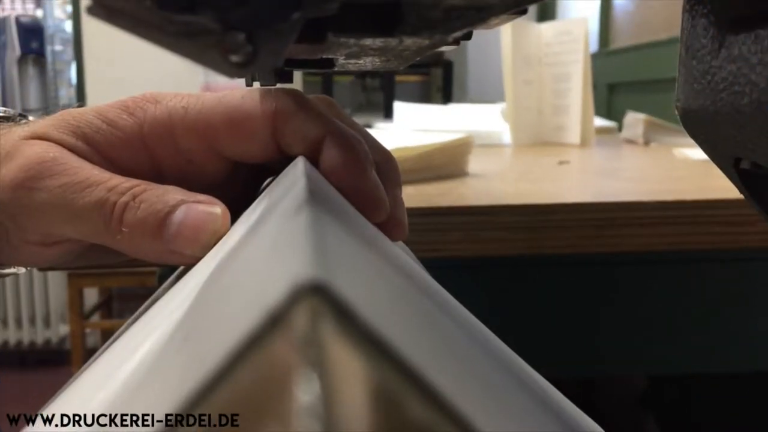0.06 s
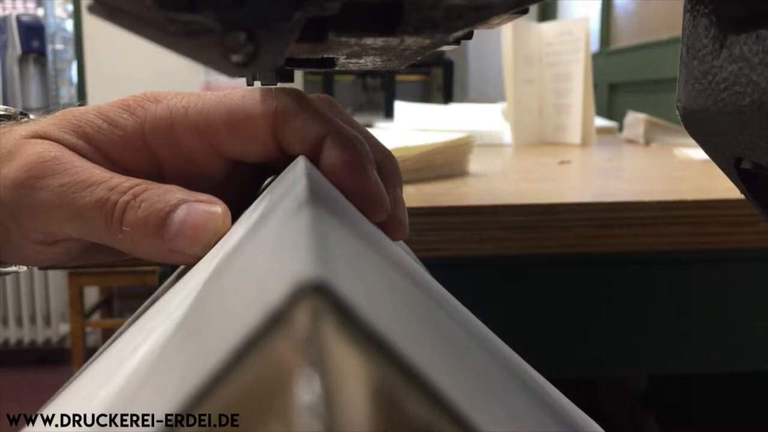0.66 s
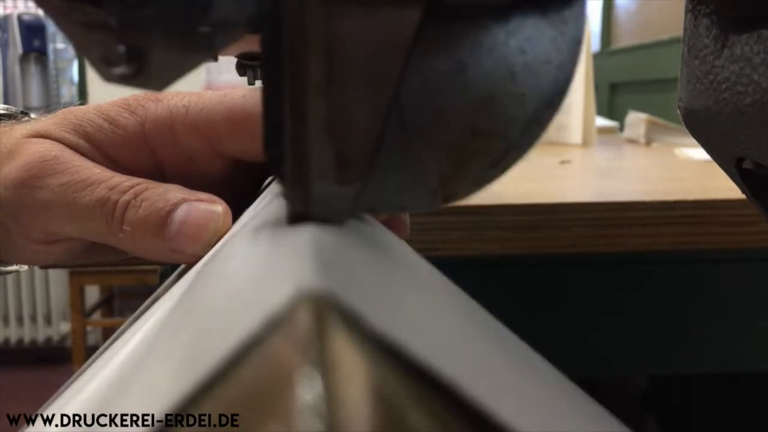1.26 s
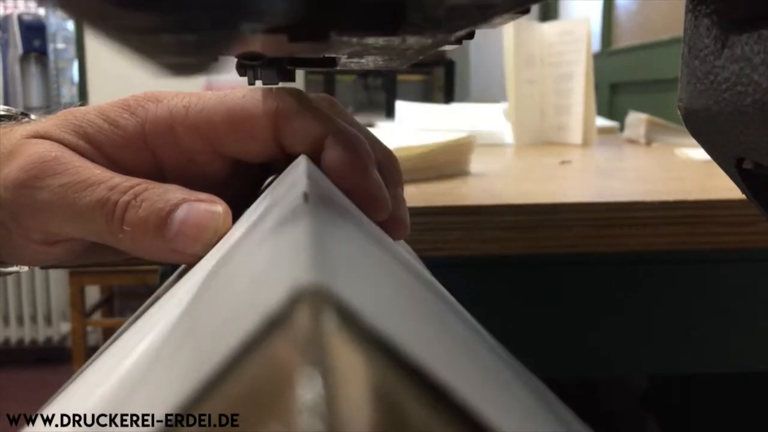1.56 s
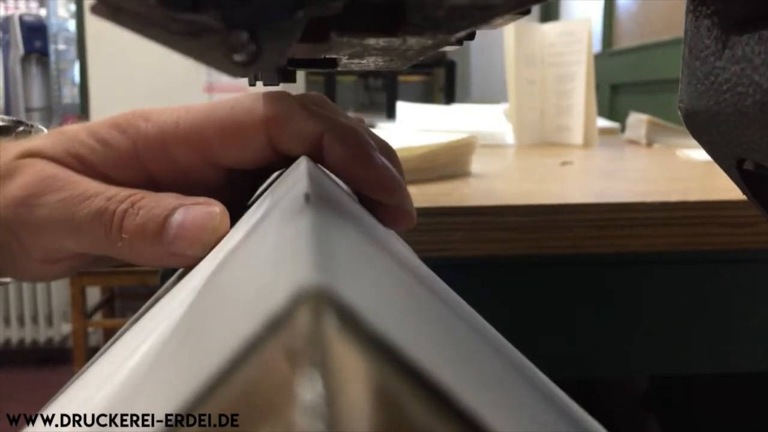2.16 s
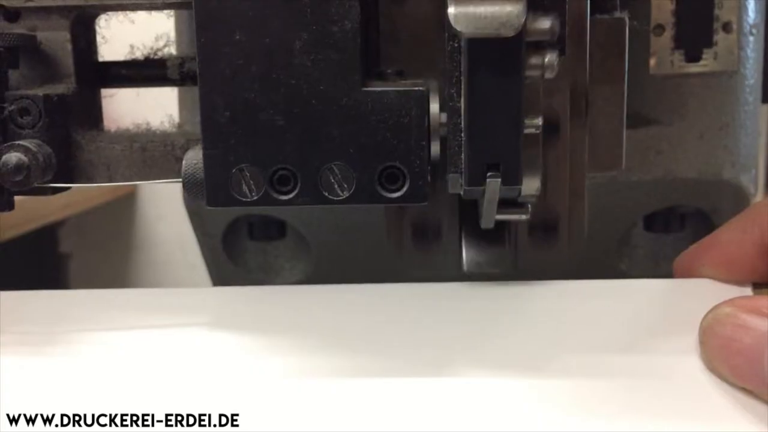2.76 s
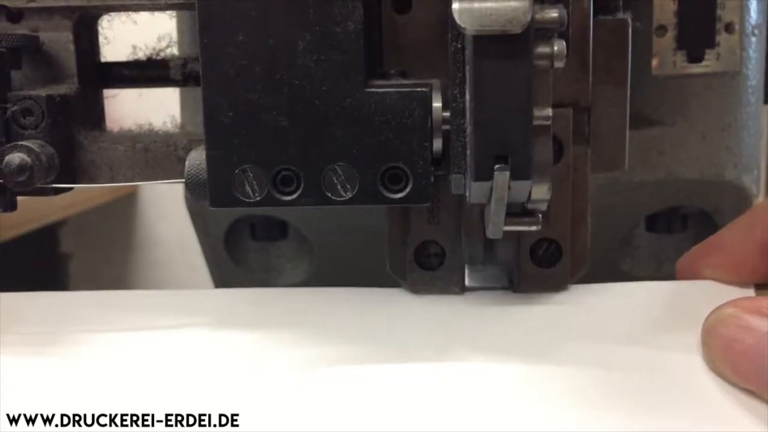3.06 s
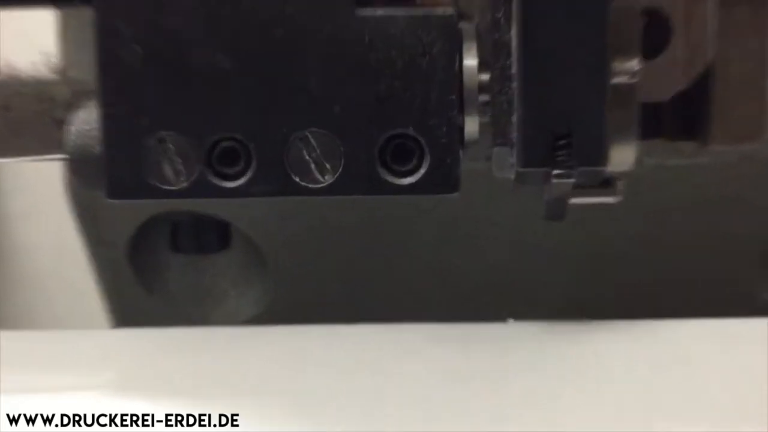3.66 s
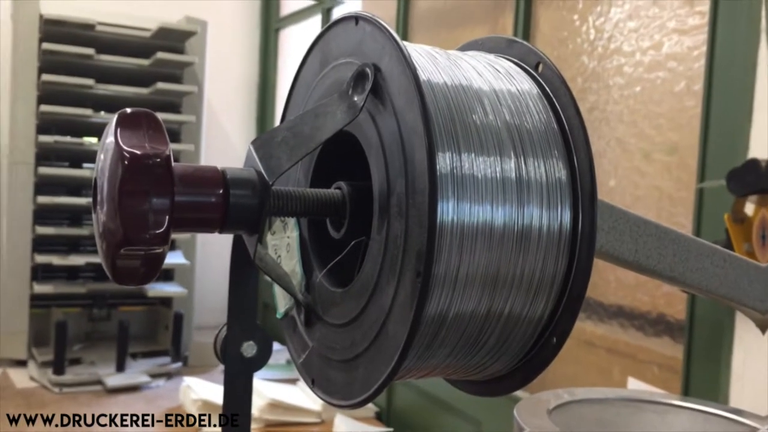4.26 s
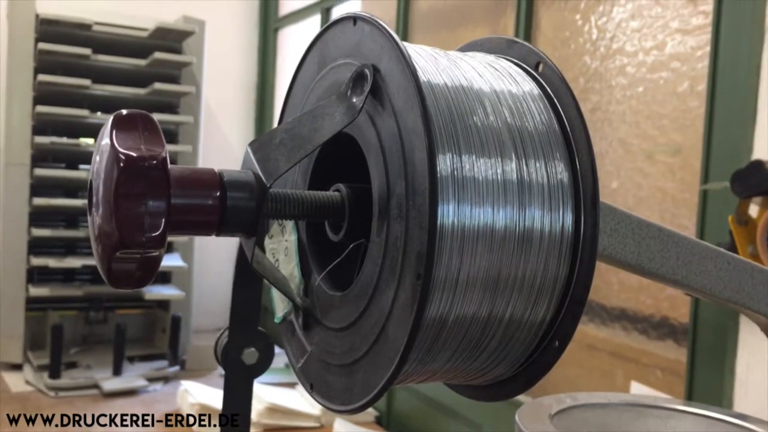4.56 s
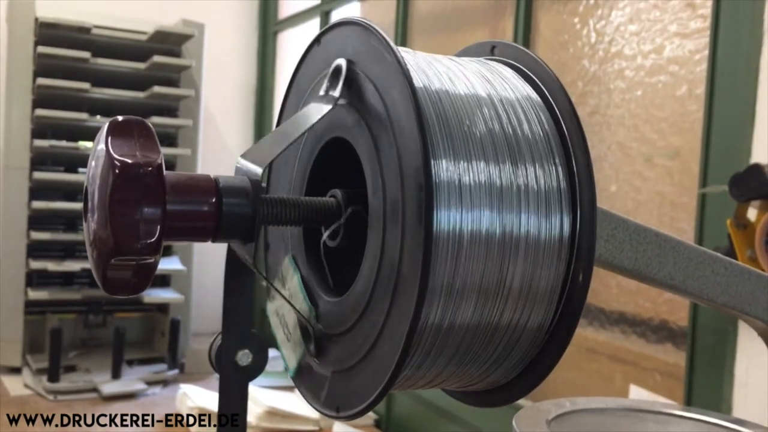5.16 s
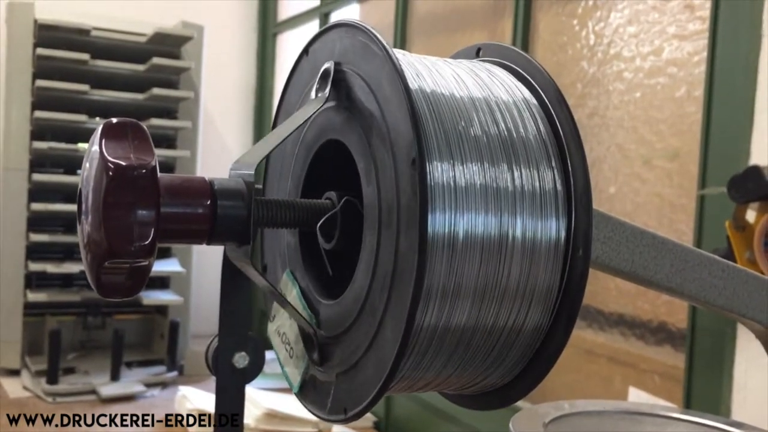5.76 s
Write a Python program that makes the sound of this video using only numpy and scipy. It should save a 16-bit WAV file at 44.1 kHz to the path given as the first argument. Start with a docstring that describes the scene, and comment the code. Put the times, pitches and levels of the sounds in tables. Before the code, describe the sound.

A wire stitching machine drives three staples, each a burst of about a second of rattling cams, rasping wire and clanking steel, with a slam and a run of ticks near the end. The microphone jumps from the saddle to the head, where the wire rasps more, then to the spool, where it sounds softer and roomier. Padded table knocks precede the first and third cycles, and faint shop air lies underneath.

```python
"""A wire stitcher drives three staples, heard from the saddle, the stitching head, then the wire spool.
Each time the clutch bites, cams chatter, wire rasps through its guides and steel parts clank, up to
the slam of the head and the ticking of the feed pawl. Sliding parts squeak; the cast frame rumbles,
hums and rings. The first two cycles cut off as the listening place changes. Soft table knocks lead
into the first and third, and a booklet slides away after the first, all over quiet shop air."""
import sys
import numpy as np
from scipy import signal
from scipy.io import wavfile
from scipy.ndimage import uniform_filter1d, minimum_filter1d

SR = 44100
rng = np.random.default_rng(int(sys.argv[2]) if len(sys.argv) > 2 else 0)


def to_wav(sig):
    """Store sig (one row per channel, or 1-D mono) as 16-bit WAV at the path in sys.argv[1].

    Samples outside -1..1 are clipped; the rate is SR.
    """
    pcm = np.clip(np.atleast_2d(sig), -1, 1) * 32767
    pcm = np.round(pcm).astype(np.int16)
    wavfile.write(sys.argv[1], SR, pcm.T)  # frames by channels


N = 264908
T = np.arange(N) / SR

# Listening places: saddle, head, spool. Each row: start and end in seconds.
PLACES = [(0, 2.324), (2.324, 3.823), (3.823, 6.1)]
# One turn of the cam shaft per place. Each row: clutch and slam times in seconds, then trims in dB
# for rattle, rasp and pawl, rumble, thuds, coasting gear and reverb.
CYCLES = [(0.804, 1.580, 0, -2, -1.5, 0.5, -1.5, -16), (2.732, 3.511, 0, 3.5, -2, -0.5, -1.5, -17.5),
          (4.100, 4.898, -5.5, -2, -6, -15, 5.5, -9)]

# Tone curves of the noise layers. Each row: frequency in Hz, relative level in dB.
SHOP_TONE = [(12, -51), (20, -4), (33, -13.5), (143, -19.5), (229, -26.5), (302, -30), (421, -17),
             (1680, -33.5), (3090, -37), (3550, -42), (4820, -38.5), (5850, -40), (15000, -64.5)]
RATTLE_TONE = [(100, -24.5), (220, -7), (330, 1), (500, 2.5), (750, 2.5), (1000, -2.5), (1500, -5.5),
               (2300, -14.5), (3200, -24.5), (6000, -43.5)]
RASP_TONE = [(1200, -1.5), (2500, 2), (3080, 7.5), (3450, -2.5), (3950, 1.5), (5200, -5.5), (5800, -7.5),
             (7000, -13), (11000, -18), (13000, -18.5), (15000, -21)]
RUMBLE_TONE = [(12, -11.5), (28, -4), (45, -0.5), (75, 7), (100, 1), (170, -1), (240, -0.5), (400, -11.5),
               (1000, -79)]
CLANK_TONE = [(60, -22), (200, -16), (450, 3), (750, 0.5), (1300, 0.5), (2000, -3), (3000, -11.5),
              (4500, -22), (7000, -51.5), (15000, -57.5)]
TICK_TONE = [(500, -26.5), (2000, -5.5), (4300, 6.5), (5600, 2), (7000, -5), (11000, -7), (15000, -14.5)]

# Soft knocks on the table. Each row: start in seconds, level in dB.
KNOCKS = [(0.0, -50.5), (0.035, -49.5), (0.068, -51.5), (0.12, -56), (0.503, -27.5), (0.514, -44.5),
          (0.561, -54), (0.617, -37), (0.668, -56), (0.735, -45), (3.870, -30), (3.915, -31), (3.98, -39),
          (4.03, -40.5)]
# The table's ring. Each row: pitch in Hz, level in dB, t60 (time to die by 60 dB) in seconds.
TABLE_MODES = [(342, -8, 0.069), (497.7, -12, 0.23), (547, -3, 0.033), (825, -30.5, 0.48),
               (1110, -29.5, 0.35), (1780, -26.5, 0.15), (1992, -32, .3), (2492, -38.5, .12)]
# The room's tail. Each row: frequency in Hz, t60 in seconds.
ROOM_DECAY = [(100, 0.44), (500, 0.94), (1500, 1), (4000, 0.61), (12000, 0.9)]

# The gear running light: relative levels of rattle, rasp and rumble in dB.
IDLE_DB = (-28.5, -54.5, -29.5)
# As the gear coasts, those three step to a new level, then die away.
COAST_STEP_DB, COAST_DB_PER_S = (-3.5, -2, 0.5), (29, 9, 28)
# Stretches of work that load the gear. Each holds: start from the slam, length and release t60
# in seconds, then relative levels of rattle, rasp and rumble in dB.
RUN_UP = (-0.775, .2, .15, -23, -57, -26.5)
FORMING = (-0.605, .15, .16, -18, -35, -26.5)
DRIVING = (-0.32, .025, .2, -21.5, -38, -31)
CLINCHING = (-0.195, .065, .36, -13, -23.5, -24.5)
FEEDING = (0.045, .135, .25, -17, -21, -29)

# The cast frame's ring. Each row: pitch in Hz, t60 in seconds, level in dB at saddle, head and spool.
FRAME_MODES = [(81.5, 0.3, -21.5, -26.5, -25), (118.7, 0.26, -21, -26, -21.5),
               (168.5, 0.23, -22.5, -17.5, -19), (224.4, 0.25, -20.5, -19.5, -18),
               (318, 0.12, -15.5, -27, -21.5), (468.4, 0.35, -19, -23.5, -19.5),
               (615.3, 0.25, -31.5, -28, -16.5), (696, 0.49, -30, -22, -20.5), (945, 0.2, -22, -21, -24.5),
               (1383, 0.3, -23.5, -21, -18.5), (1810, 0.17, -41.5, -27, -33.5),
               (1940, 0.26, -27.5, -34.5, -25.5), (3930, 0.079, -34, -28, -40)]
# Steel blows of every turn. Each row: start from the slam, contact time and clank t60 in seconds,
# note in Hz, note and clink trims in dB, level in dB at the three places, tick trim in dB at the three.
BLOWS = [(-0.795, .003, .07, 645, 2, -25, -60, -60, -22, -30, -30, -30),
         (-0.738, .002, .065, 830, -6, -26, 0.5, 1, -23, -40, -29, -14),
         (-0.699, .0012, .055, 1100, -8, -13, -1, -0.5, -13, -5.5, -6, -8),
         (-0.638, .001, .07, 2207, -10, -9, 1.5, -4, -9, -13, -10, -13),
         (-0.628, .001, .04, 900, -4, -13, -6, -10, -14, -10, -4, -18),
         (-0.606, .003, .07, 570, -4, -16, -5, -3, -2.5, -24, -33, -16),
         (-0.523, .0008, .06, 1280, -6, -13, 7, 1.5, -8.5, -20, -21, -30),
         (-0.495, .001, .062, 1410, -3, -11, 1.5, 3.5, -11, -13, -17, -15),
         (-0.465, .002, .065, 866, -8, -14, -4, -4, -18, -18, -17, -19),
         (-0.367, .001, .032, 730, 2, -6, -16, -23, -30, -28, -9, -20),
         (-0.339, .0005, .09, 616, -3, -19, 8.5, 6, -7, -18, -15, -22),
         (-0.216, .0007, .09, 2244, -6, -5, 2.5, -1, -11, -10, -14, -24),
         (-0.193, .005, .09, 670, -3, -16, -1, 6, -8, -23, -12, -15),
         (-0.141, .0012, .05, 1447, -1, -17, -6, -2.5, -16, -2, -6, -4),
         (-0.109, .0015, .045, 1483, -7, -18, -6, -9, -16, -12, -6, -6),
         (-0.069, .001, .03, 620, 1, -16, -28, -26, -30, 5, 2, 0),
         (-0.014, .001, .03, 610, -7, -16, -12, -30, -30, -11, -18, -18),
         (0.000, .0006, .072, 900, -7, -13, 17, 17, 0.5, -18, -17, -15),
         (0.015, .005, .065, 700, -1, -24, 4.5, -2, -2, -23, -25, -22),
         (0.048, .004, .068, 747, 0, -10, -8, -1, -11, -24, -14, -21),
         (0.138, .005, .09, 830, -4, -9, 0.5, -0.5, -13, -28, -10, -16),
         (0.176, .004, .075, 790, 3, -20, -7.5, -4.5, -7.5, -23, -19, -21),
         (0.219, .001, .046, 958, 0, -23, -7, -5, -14, -34, -34, -30),
         (0.257, .0015, .055, 850, -4, -21, 0, -6, -20, -20, -14, -27)]
# Small steel parts in the head. Each row: pitch in Hz, t60 in seconds, relative level in dB.
STEEL_MODES = [(1866, .07, 3.5), (2020, .04, -5.5), (2420, 0.047, 8), (2742, 0.085, -8), (3040, 0.035, 3.5),
               (3212, 0.015, -9), (3530, 0.017, -7.5), (3920, .06, -2), (4620, 0.043, -12.5),
               (5130, 0.048, -5.5), (5600, 0.046, -17)]
# Brief tones: squeaks and groans of sliding parts, low hums of the frame, and one faint ting with a
# table knock. Each row: start and length in seconds, pitch in Hz, level in dB, rise as a share of pitch.
BRIEF_TONES = [(0.798, 0.05, 329, -29.5, 0), (1.289, 0.063, 2240, -34, 0.065), (1.42, .1, 1550, -31, 0.012),
               (3.33, 0.14, 165.5, -28, 0.0076), (3.52, 0.1, 161.7, -28, 0.017),
               (3.905, 0.028, 1980, -57, 0.043), (4.079, 0.215, 318, -32.5, 0.2),
               (4.198, 0.069, 339.7, -27, 0.015), (4.285, .075, 589, -25, 0.016),
               (4.95, 0.17, 3137, -40, 0)]
# Low shoves of the head on the saddle. Each row: start from the slam in seconds, relative level in dB,
# pitch in Hz, t60 in seconds.
THUDS = [(-0.765, -20, 120, .15), (-0.628, -11.5, 76, .15), (-0.463, -8, 61, .14), (-0.334, -17, 40, .2),
         (-0.04, -17.5, 32, .29), (0.0, -11.5, 74, .12), (0.02, -20, 118, .15)]
# Microphone colour, with hollows in the treble. Each row: frequency in Hz, gain in dB.
MIC_TONE = [(20, 4), (2300, 0.5), (2620, -1.5), (2900, 0.5), (6000, -2), (6400, -8), (7350, -5.5),
            (7650, -20), (8400, -18.5), (8700, -7.5), (9600, -10), (10100, -2.5), (12800, -1), (15000, -6),
            (16000, -21)]


def amp(db):
    """Decibels as a gain."""
    return 10 ** (np.asarray(db) / 20)


def unit(x):
    """The signal at an RMS of one."""
    return x / np.sqrt(np.mean(x ** 2) + 1e-20)


def curve_at(points, hz):
    """A curve's value along a log frequency axis."""
    f, value = np.transpose(points)
    return np.interp(np.log(hz + 1), np.log(f), value)


def add(mix, start, sound):
    """Lay a sound into the mix at a time in seconds."""
    part = mix[max(round(start * SR), 0):][:len(sound)]
    part += sound[:len(part)]


def fade(t, t60):
    """A decay that loses 60 dB every t60 seconds."""
    return np.exp(-np.log(1000) * t / np.maximum(t60, 1e-3))


def colour(x, tone, size=4096):
    """A minimum-phase EQ that follows a tone curve."""
    log_gain = np.log(amp(curve_at(tone, abs(np.fft.fftfreq(size, 1 / SR)))))
    taps = np.fft.ifft(np.exp(np.conj(signal.hilbert(log_gain)))).real
    return signal.oaconvolve(x, taps)[:len(x)]


def noise(tone, length=N):
    """Steady noise shaped to a tone curve."""
    return unit(colour(rng.standard_normal(length), tone))


def shop_air(level_db=-68):
    """The quiet shop: a faint, dark bed of noise."""
    return amp(level_db) * noise(SHOP_TONE)


def table_knocks(scuff_db=-7, scuff_t60=.17, rise_s=0.0014):
    """Light, padded knocks ring the table, each with a short scuff."""
    out, t = np.zeros(N), T[:SR // 2]
    ring = sum(amp(db) * np.sin(2 * np.pi * hz * t) * fade(t, t60) for hz, db, t60 in TABLE_MODES)
    scuff_tone = [(80, -18.5), (330, -1), (550, 14), (1000, -12.5), (2500, -24), (9000, -50)]
    for start, db in KNOCKS:
        scuff = amp(scuff_db) * noise(scuff_tone, len(t)) * fade(t, scuff_t60)
        add(out, start, amp(db) * (1 - np.exp(-t / rise_s)) * (ring + scuff))
    return out


def room(x, wet_db, onset_s=0.004):
    """The room adds a diffuse tail that hangs longest in the mids."""
    hz, t, bands = signal.stft(rng.standard_normal(SR), SR, nperseg=256)
    envelope = fade(t, curve_at(ROOM_DECAY, hz)[:, None]) * (1 - np.exp(-t / onset_s))
    tail = signal.istft(bands * envelope, SR, nperseg=256)[1]
    return x + amp(wet_db) * signal.oaconvolve(x, tail / np.linalg.norm(tail))[:N]


def gear_effort(clutch, slam, coast_db, slip_db=-12, slip_s=.05, engage_s=.025, load_s=.012,
                run_on_s=.26, brake_s=.05):
    """Rattle, rasp and rumble envelopes: the clutch slips and bites, work loads the gear, it coasts."""
    slip = amp(slip_db) * np.clip((T - clutch) / slip_s + 1, 0, 1)
    bite = np.clip((T - clutch) / engage_s + .5, 0, 1) ** 2
    turning = np.maximum(bite, slip)
    coast_s = np.maximum(T - slam - run_on_s, 0)
    braking = np.minimum(coast_s / brake_s, 1)
    levels = np.array([turning * amp(db + (step_db + coast_db) * braking - db_per_s * coast_s)
                       for db, step_db, db_per_s in zip(IDLE_DB, COAST_STEP_DB, COAST_DB_PER_S)])
    for offset, length, t60, *load_db in (RUN_UP, FORMING, DRIVING, CLINCHING, FEEDING):
        t = T - slam - offset
        load = np.clip(t / load_s, 0, 1) * fade(np.maximum(t - length, 0), t60)
        levels = np.hypot(levels, amp(load_db)[:, None] * load)
    return levels


def clicks(per_s, spread_db):
    """Random small collisions, some harder than the rest."""
    size = amp(spread_db * np.minimum(rng.exponential(1, N), 3))
    return size * rng.choice([-1, 1], N) * (rng.random(N) < per_s / SR)


def running_gear(effort, rattle_db, rasp_db, rumble_db, level_db=-2.5, grain_t60=0.013):
    """Cams and links chatter, wire scrapes through its guides, and the frame shakes."""
    rattle_level, rasp_level, rumble_level = amp(level_db) * effort
    chatter = unit(clicks(per_s=1500, spread_db=1))
    catches = uniform_filter1d((chatter + clicks(per_s=270, spread_db=1.5)) ** 2, size=20)
    # every catch of the wire lets go a short burst of hiss
    bursts = np.sqrt(abs(signal.oaconvolve(catches, fade(T[:SR // 20], grain_t60) ** 2)[:N]))
    rattle = amp(rattle_db) * rattle_level * unit(colour(chatter, RATTLE_TONE))
    rasp = amp(rasp_db) * rasp_level * unit(bursts * noise(RASP_TONE))
    rumble = amp(rumble_db) * rumble_level * noise(RUMBLE_TONE)
    return rattle + rasp, rumble


def frame_ring(drive, place, ring_db=0.2):
    """The cast frame rings along with the metal; each place hears its own balance of modes."""
    out, t = np.zeros(N), T[:SR]
    for hz, t60, *place_db in FRAME_MODES:
        mode = np.sin(2 * np.pi * hz * t) * fade(t, t60)
        out += amp(place_db[place]) * unit(signal.oaconvolve(drive, mode)[:N])
    return amp(ring_db) * drive.std() * out


def steel_blows(place, slam, clank_db=-10, linger_db=-22, linger_t60=0.15, note_db=-10, note_t60=0.075,
                overtone_ratio=1.48, overtone_db=-7, clink_db=-8, tick_db=-1.5, tick_t60_share=0.55):
    """Each blow wakes a dull clank, the struck part's note, a clink of small parts and a bright tick."""
    out, t = np.zeros(N), T[:SR // 3]
    clank_noise, tick_noise = noise(CLANK_TONE), noise(TICK_TONE)
    for offset, contact_s, t60, hz, note_trim, clink_trim, *by_place in BLOWS:
        start = slam + offset
        db, tick_trim = by_place[place::len(PLACES)]
        span = slice(round(start * SR), round(start * SR) + len(t))
        clank = amp(clank_db) * clank_noise[span] * (fade(t, t60) + amp(linger_db) * fade(t, linger_t60))
        phase = 2 * np.pi * hz * t
        partials = np.sin(phase) + amp(overtone_db) * np.sin(overtone_ratio * phase)
        note = amp(note_db + note_trim) * 2 * partials * fade(t, note_t60)
        clink = amp(clink_db + clink_trim) * steel_clink(t)
        tick = amp(tick_db + tick_trim) * tick_noise[span] * fade(t, t60 * tick_t60_share)
        attack = 1 - np.exp(-t / contact_s)
        add(out, start, amp(db) * plate_echoes(attack * (clank + note + clink + tick)))
    return out


def steel_clink(t):
    """One strike on the small steel parts; the point of contact sets each mode's share by chance."""
    hz, t60, db = np.transpose(STEEL_MODES)[:, :, None]
    share = amp(db) * rng.standard_normal(hz.shape)
    modes = share * np.sin(2 * np.pi * hz * t) * fade(t, t60)
    return modes.sum(0) * np.sqrt(2 / np.sum(share ** 2))


def plate_echoes(x, echo_db=-4, longest_s=.003, low_cut_hz=800, count=5):
    """Nearby steel plates throw back very short echoes, which colour each blow in its own way."""
    delays, signs = rng.uniform(.1, 1, count) * longest_s, rng.choice([-1, 1], count)
    bright = signal.sosfilt(signal.butter(2, low_cut_hz, "high", fs=SR, output="sos"), x)
    out = x.copy()
    for delay, sign in zip(delays, signs):
        add(out, delay, sign * amp(echo_db) / np.sqrt(count) * bright)
    return out * x.std() / out.std()


def brief_tones(start, end, waver=0.02, roughness=.45):
    """Squeaks, groans, hums and a ting: each one tone that swells and fades, unsteady in pitch and level."""
    out = np.zeros(N)
    for onset, length, hz, db, glide in BRIEF_TONES:
        wobble = unit(uniform_filter1d(rng.standard_normal((2, SR)), size=300))
        drift, flutter = wobble[:, :int(length * SR)]
        pitch = hz * (1 + waver * drift + glide * np.linspace(-.5, .5, len(drift)))
        swell = np.hanning(len(drift)) * (1 + roughness * flutter)
        if start <= onset < end:
            add(out, onset, amp(db) * swell * 2 * np.sin(2 * np.pi * np.cumsum(pitch) / SR))
    return out


def head_thuds(slam, level_db, rise_s=0.024):
    """The head presses on the saddle; each shove gives a few slow, damped swings."""
    out, t = np.zeros(N), T[:SR // 2]
    attack = 1 - np.exp(-t / rise_s)
    for offset, db, hz, t60 in THUDS:
        add(out, slam + offset, amp(db + level_db) * attack * np.sin(2 * np.pi * hz * t) * fade(t, t60))
    return out


def feed_pawl(slam, trim_db, level_db=-14, spread_db=2, clink_db=-10, teeth=6,
              first_s=.052, tooth_s=.0225, jitter_s=.003, rise_s=0.00077, t60=0.016):
    """After the slam the feed pawl drops from tooth to tooth as it pulls new wire from the spool."""
    out, t = np.zeros(N), T[:SR // 10]
    tick_noise = noise(TICK_TONE)
    attack = 1 - np.exp(-t / rise_s)
    for tooth, (late, force) in enumerate(rng.standard_normal((teeth, 2))):
        start = slam + first_s + tooth * tooth_s + jitter_s * late
        tick = tick_noise[round(start * SR):][:len(t)] * fade(t, t60)
        clink = amp(clink_db) * steel_clink(t)
        add(out, start, amp(trim_db + level_db + spread_db * force) * attack * (tick + clink))
    return out


def booklet_slide(start=2.21, length=.14, level_db=-50):
    """A hand slides the stitched booklet along the saddle: a soft swish, cut off with the first cycle."""
    out = np.zeros(N)
    swell = np.hanning(int(length * SR)) ** .5
    paper = noise([(300, -8), (900, 0), (2500, -6), (5000, -18), (14000, -30)])
    add(out, start, amp(level_db) * swell * paper[:len(swell)])
    return out * (T < PLACES[0][1])


def scene():
    """The machine cycles once for each listening place, over the quiet shop."""
    mix = shop_air() + room(table_knocks(), wet_db=-9) + booklet_slide()
    for place, (start, end) in enumerate(PLACES):
        clutch, slam, rattle_db, rasp_db, rumble_db, thud_db, coast_db, wet_db = CYCLES[place]
        effort = gear_effort(clutch, slam, coast_db)
        gear, rumble = running_gear(effort, rattle_db, rasp_db, rumble_db)
        metal = gear + steel_blows(place, slam) + feed_pawl(slam, rasp_db)
        direct = metal + frame_ring(metal, place) + brief_tones(start, end)
        cycle = room(direct, wet_db) + rumble + head_thuds(slam, thud_db)
        mix += cycle * (T < end)
    return mix[None]


def record(dry, threshold_db=-12, squeeze=0.1, recover_db_per_s=70, ceiling=.97, high_cut_hz=15900):
    """Microphone colour, a gentle duck after the hardest blows, a fast limiter and a high cut."""
    x = colour(dry[0], MIC_TONE)
    power_db = 10 * np.log10(abs(uniform_filter1d(x ** 2, size=200)) + 1e-12)
    fall_db = T * recover_db_per_s
    held_db = np.maximum.accumulate(power_db + fall_db) - fall_db  # jumps to each peak, then sinks
    over_db = np.maximum(held_db - threshold_db, 0)
    x = x / amp(squeeze * uniform_filter1d(over_db, size=100))
    limiter_gain = ceiling / np.maximum(abs(x), ceiling)
    x = x * uniform_filter1d(minimum_filter1d(limiter_gain, size=41), size=41)
    low_pass = signal.firwin(511, high_cut_hz, window=("kaiser", 9), fs=SR)
    return signal.oaconvolve(x, low_pass, "same")[None]


dry = scene()
out = record(dry)
to_wav(out)
```